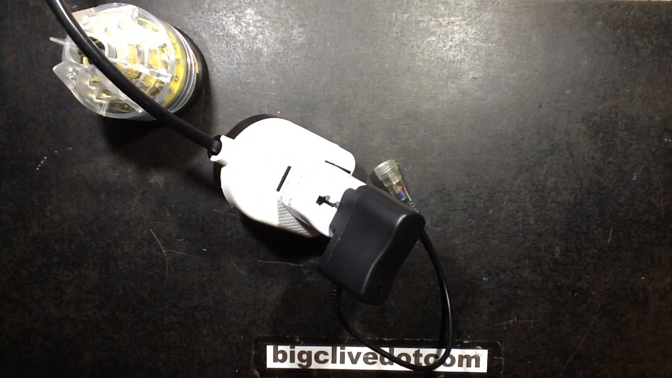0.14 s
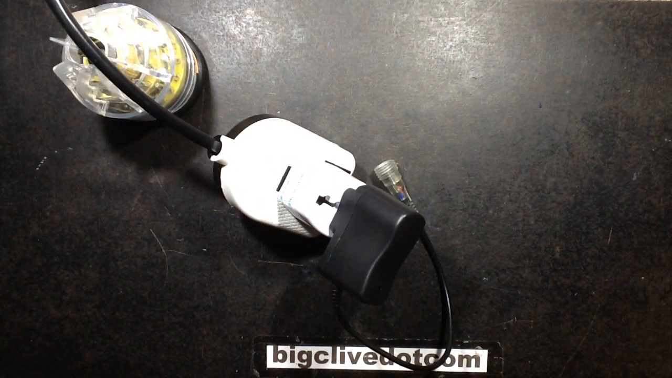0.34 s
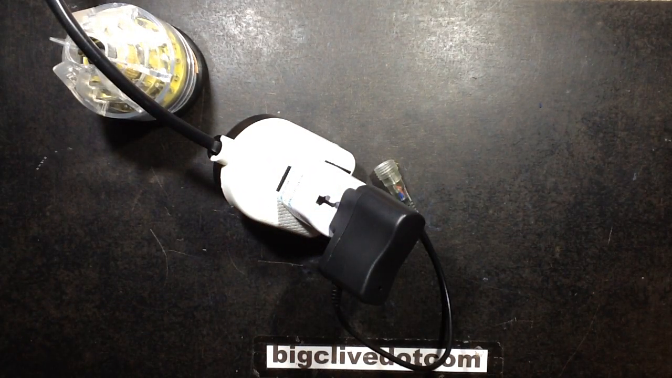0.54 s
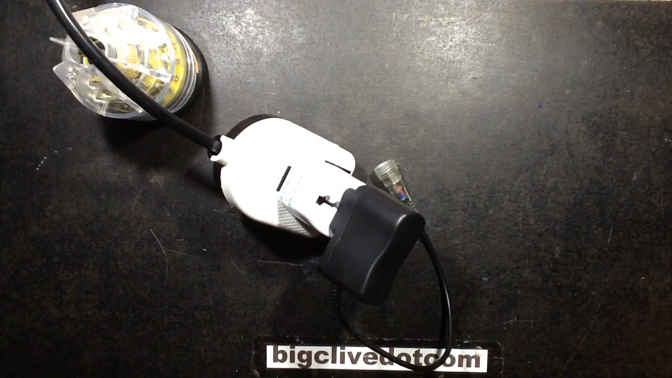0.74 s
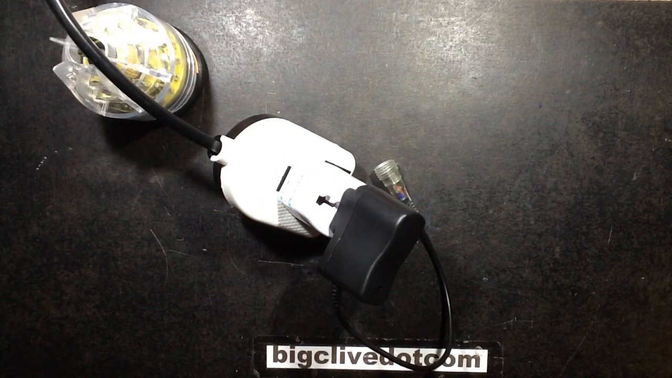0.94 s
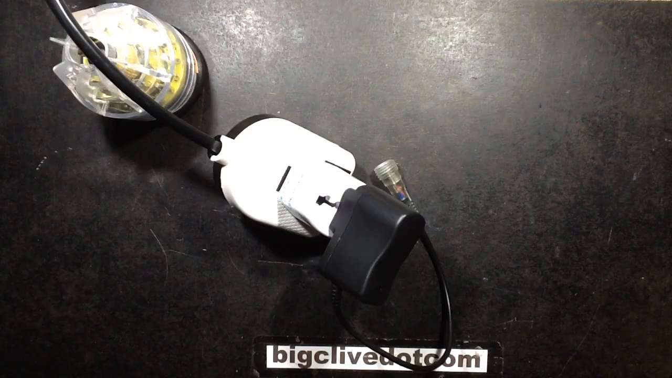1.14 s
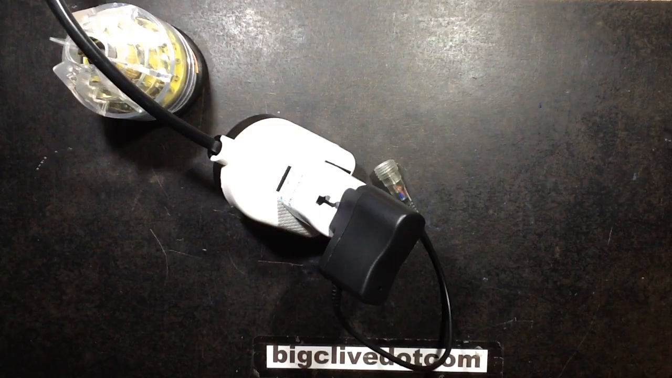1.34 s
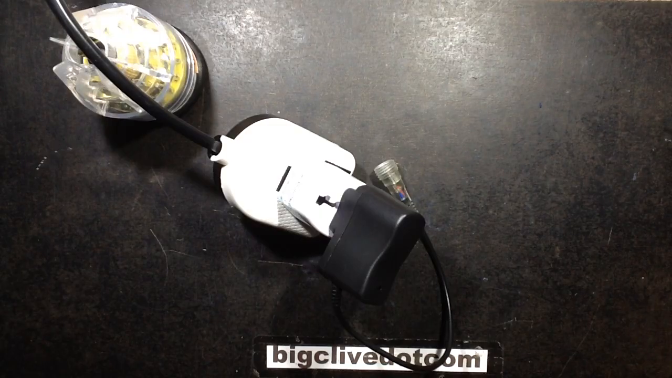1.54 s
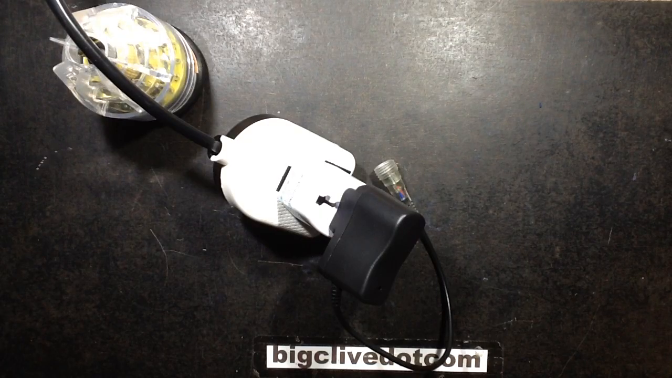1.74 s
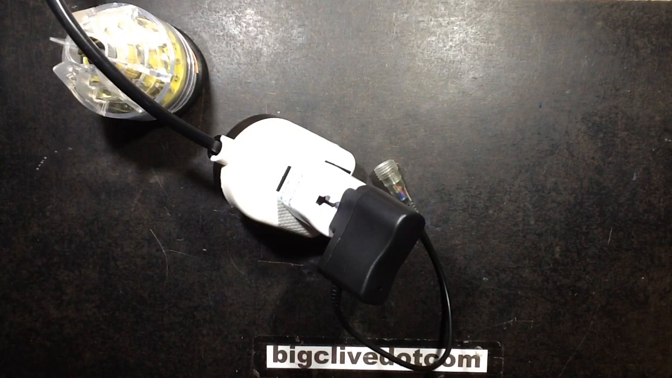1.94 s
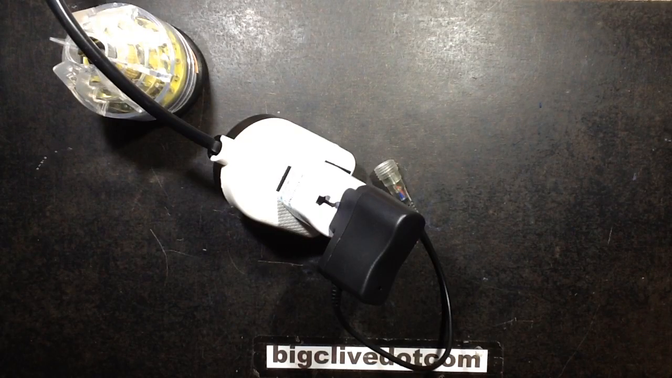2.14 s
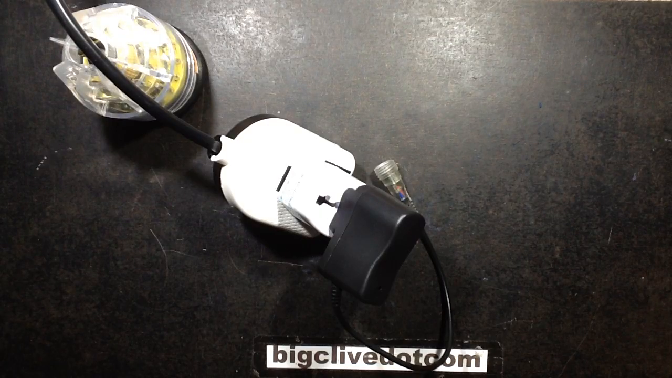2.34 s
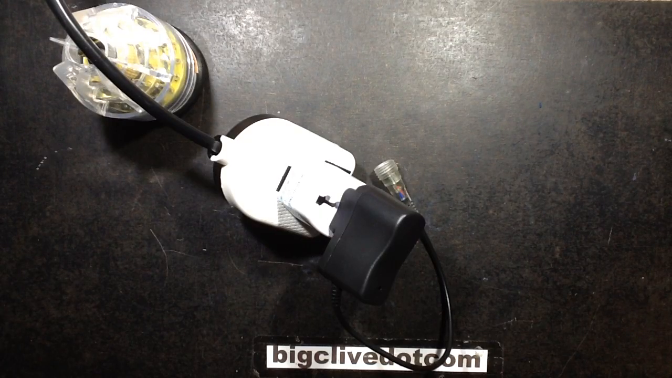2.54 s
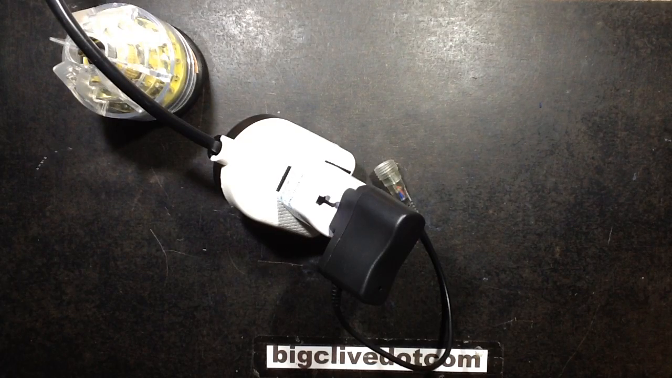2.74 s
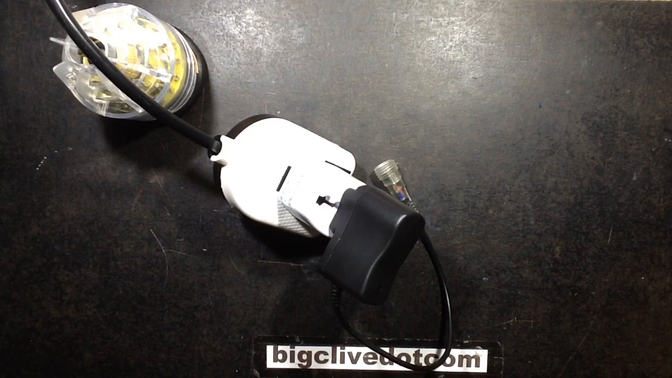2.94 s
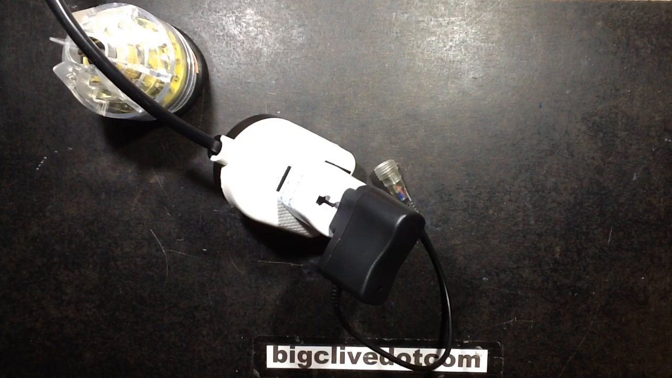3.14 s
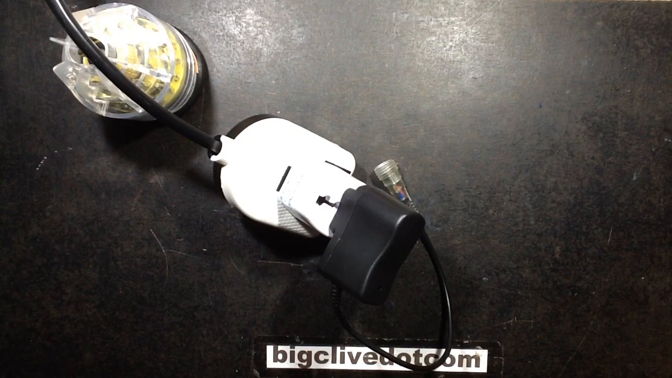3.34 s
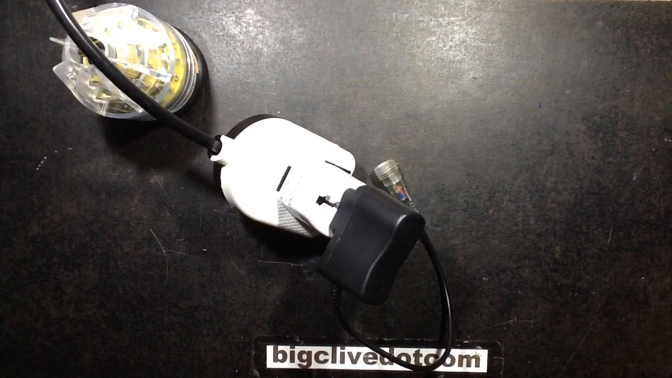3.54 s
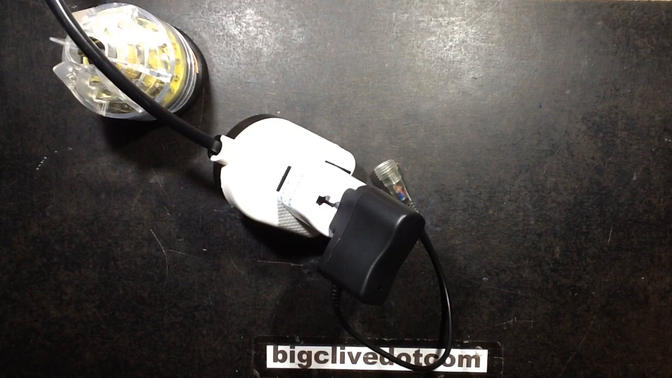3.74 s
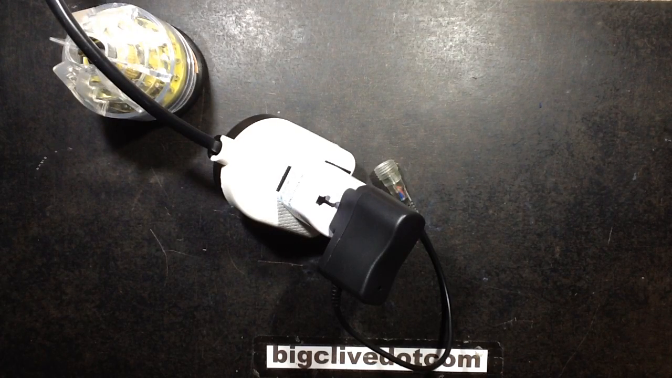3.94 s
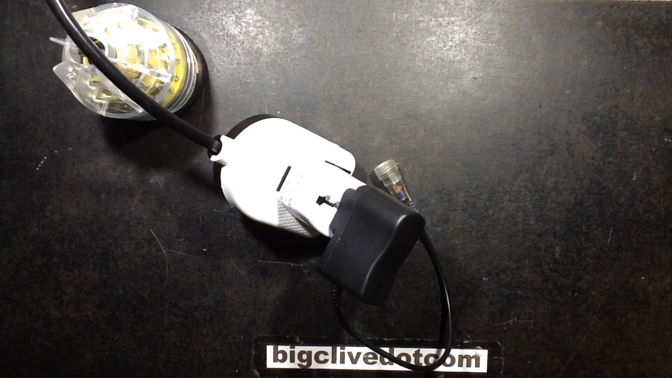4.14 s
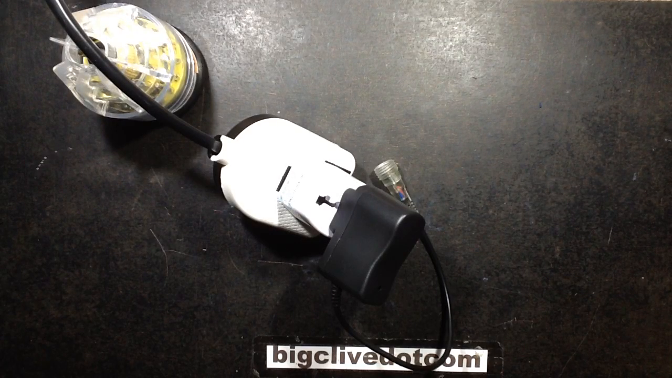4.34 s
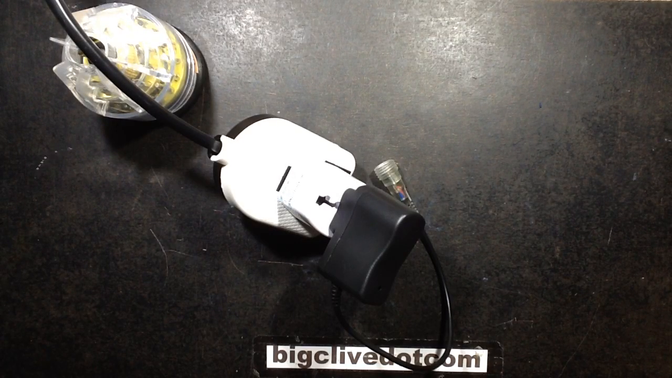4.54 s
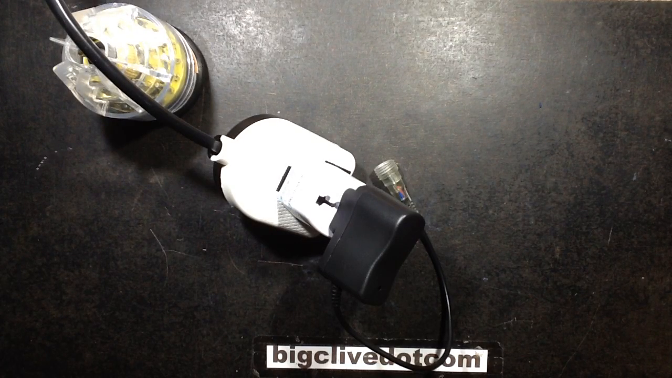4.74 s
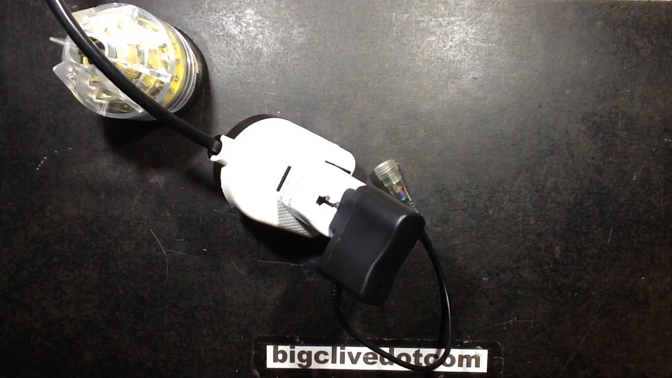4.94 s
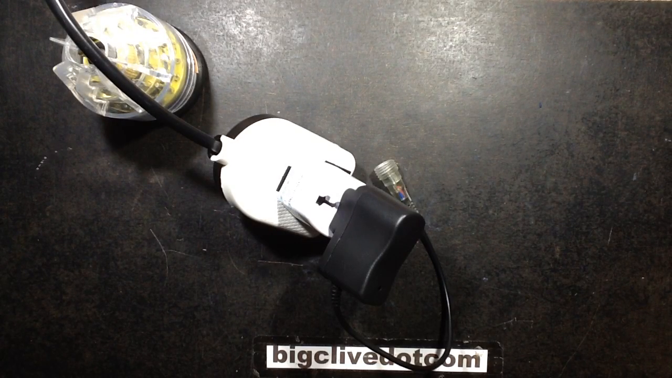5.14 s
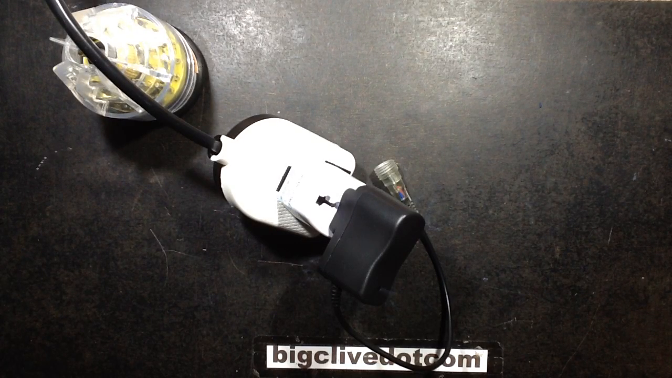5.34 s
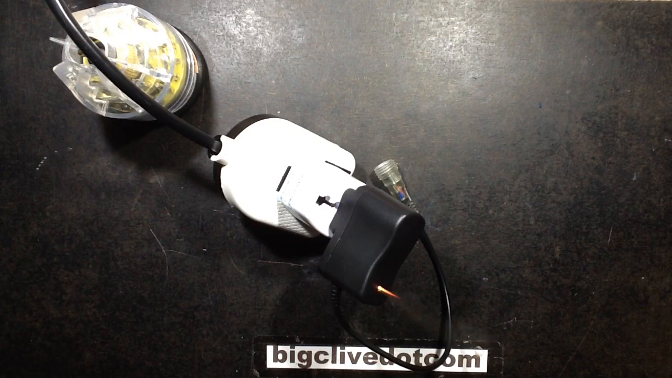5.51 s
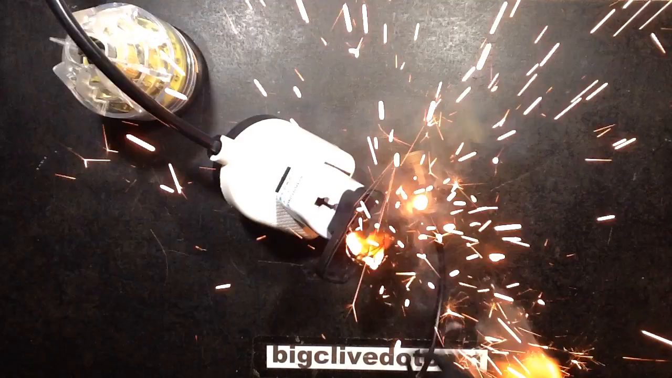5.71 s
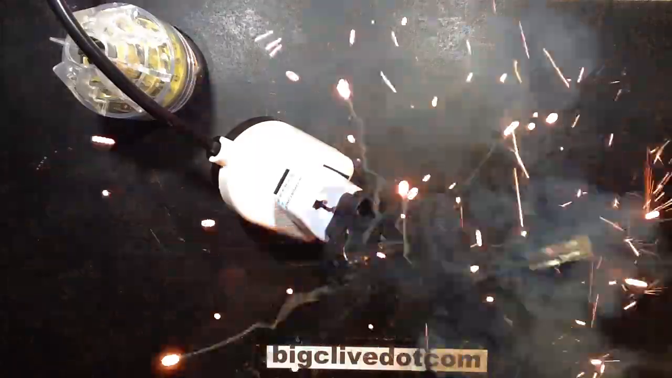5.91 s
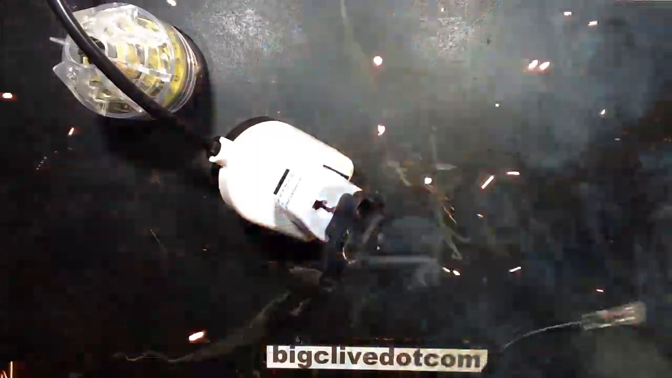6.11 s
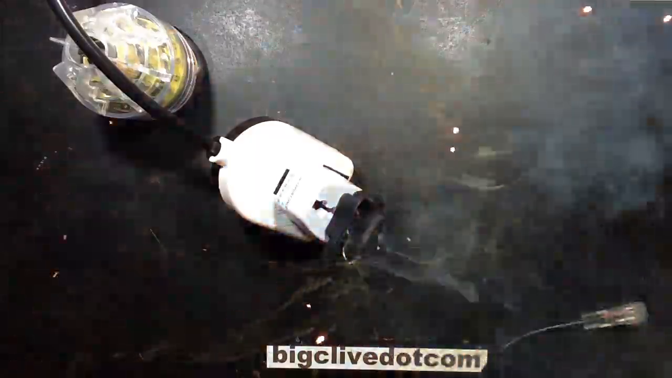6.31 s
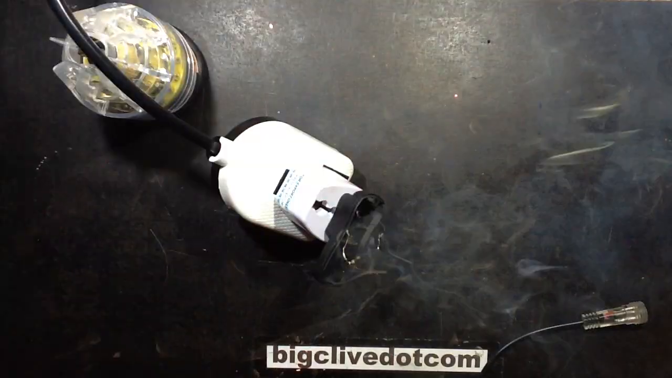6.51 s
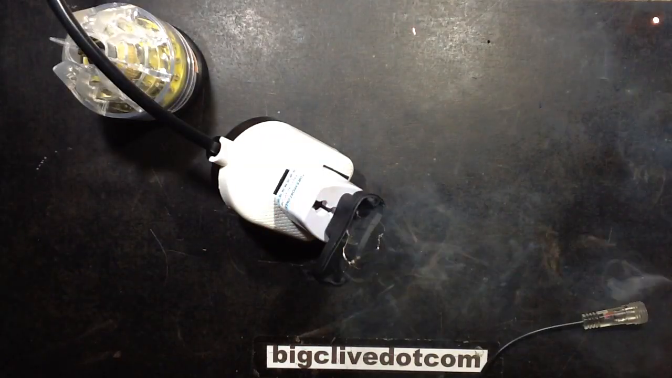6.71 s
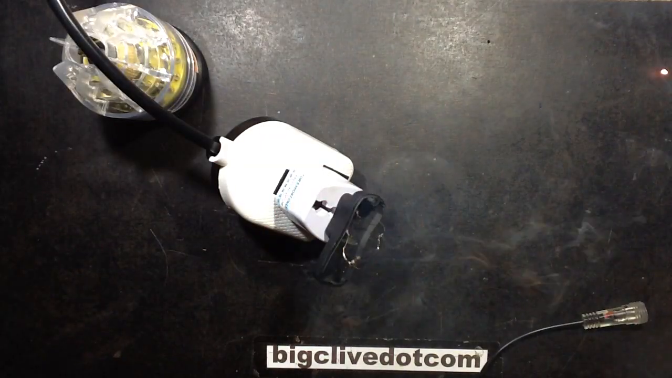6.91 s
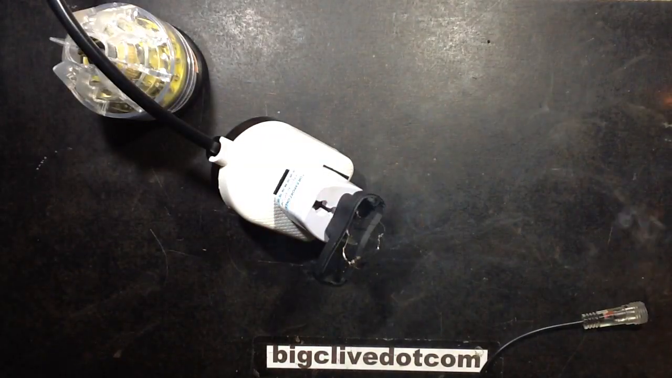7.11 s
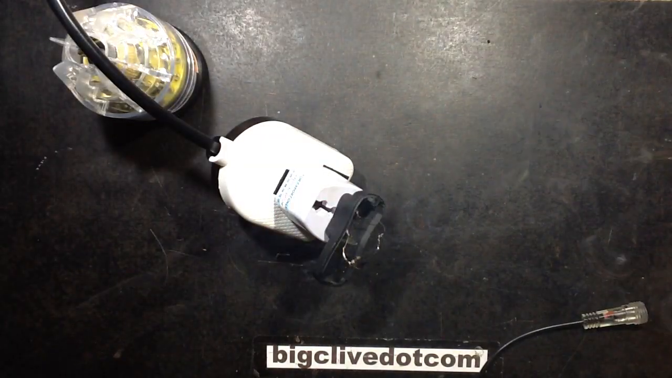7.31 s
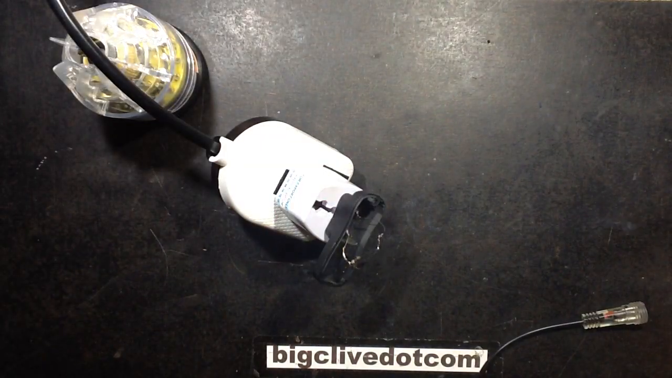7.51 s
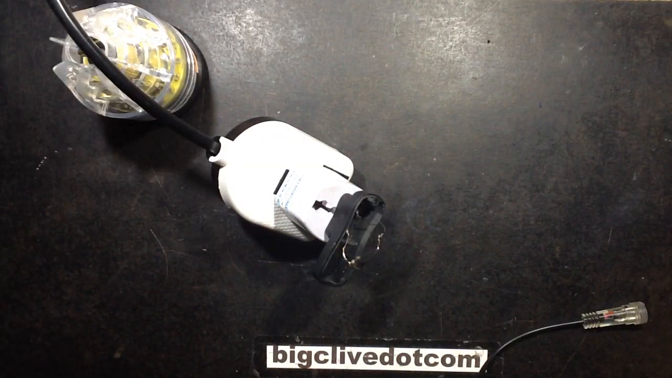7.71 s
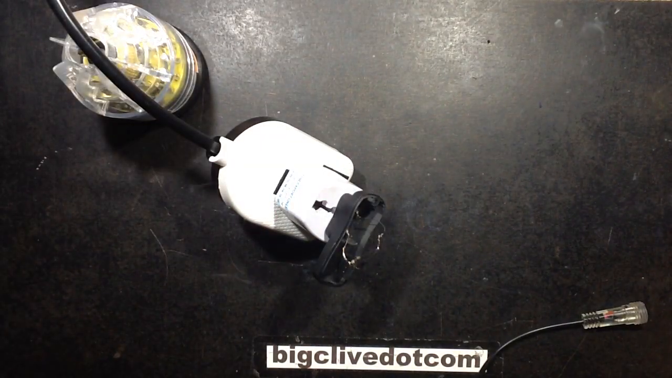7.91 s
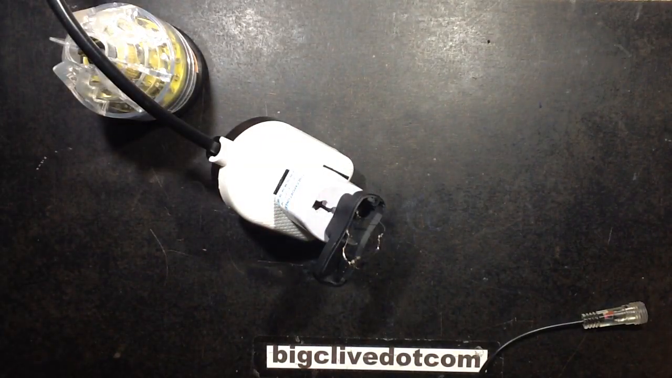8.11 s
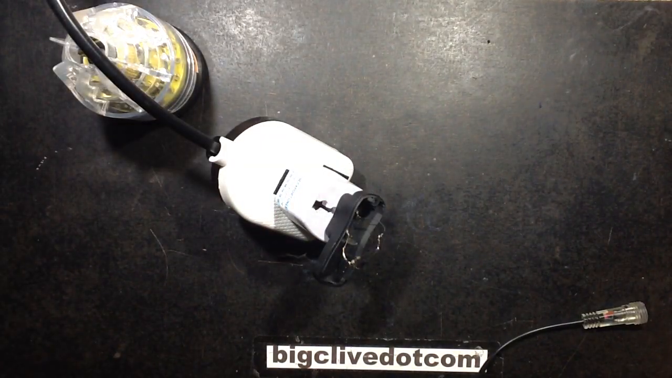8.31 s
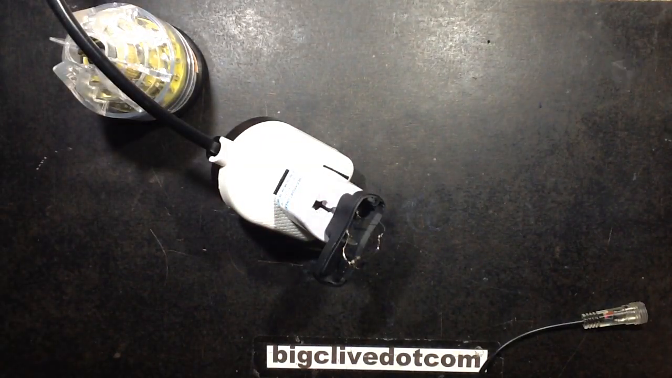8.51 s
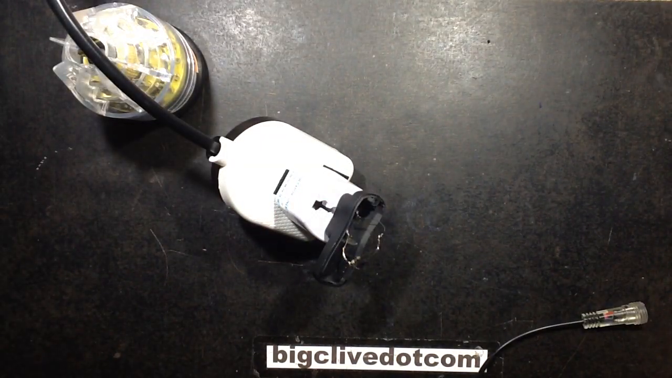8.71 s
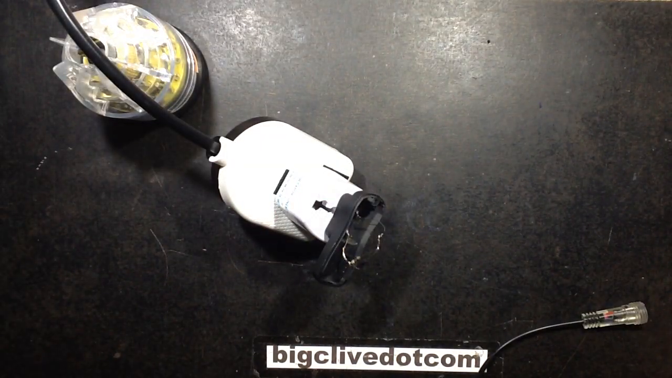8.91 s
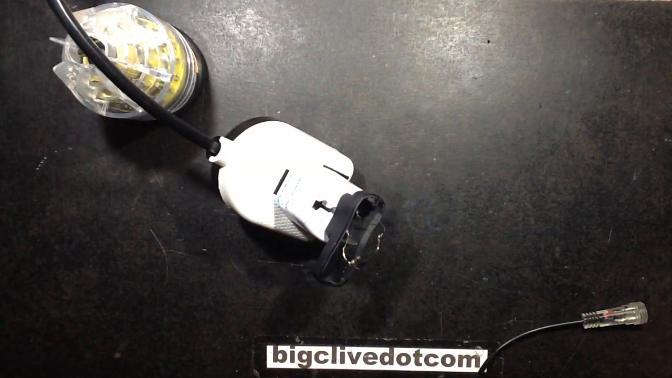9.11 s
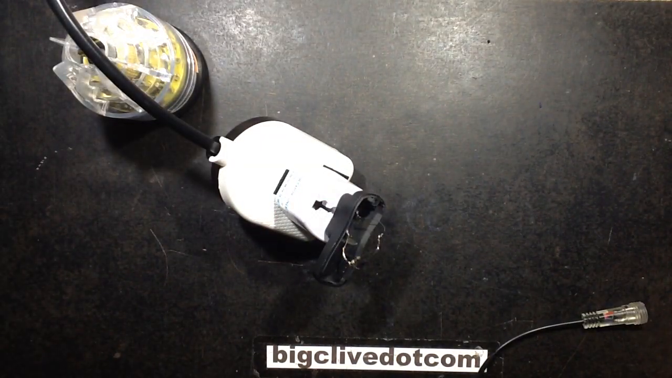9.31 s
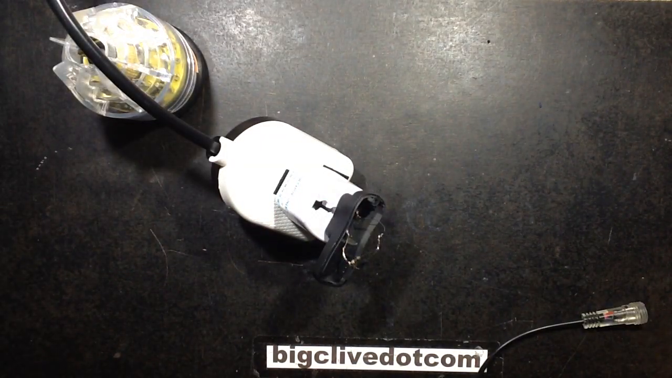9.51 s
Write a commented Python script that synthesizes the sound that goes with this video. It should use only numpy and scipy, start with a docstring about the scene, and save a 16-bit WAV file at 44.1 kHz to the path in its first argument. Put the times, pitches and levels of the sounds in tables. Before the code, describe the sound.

Faint hiss with scattered soft knocks, then a sudden double electrical bang with crackle, plastic pieces clattering down, tiny ticks, and a few late thuds.

```python
"""Power supply bursting on a bench

Over hiss and rumble come far knocks and thuds (swelling noise, damped modes) and rubbing noise.
An arc then strikes on mains half cycles: ragged noise, a pressure swing and ringing case and bench modes.
It bursts the case twice; pieces clack and skitter, embers tick as short noise.
A faint chopped whine sounds near the end, before a last rub."""
import sys
import numpy as np
from scipy import signal
from scipy.fft import rfft, irfft
from scipy.io import wavfile
from scipy.ndimage import uniform_filter1d

SR = 44100
rng = np.random.default_rng(int(sys.argv[2]) if len(sys.argv) > 2 else 0)


def master(y):
    """Save y as 16-bit WAV."""
    cut = np.clip(np.atleast_2d(y).T, -1, 1)
    pcm = np.round(cut * 32767)  # scale
    wavfile.write(sys.argv[1], SR, pcm.astype(np.int16))


N = 421596

# hiss level of the floor, which sinks after the bang and creeps back: (time [s], level [dB])
FLOOR_LEVEL = [(0, -64), (.4, -65.5), (1.1, -67), (2.5, -68), (5.5, -67.8), (6.3, -74), (6.9, -70),
               (7.9, -69), (8.6, -67.5), (9.56, -67.5)]
# relative spectra of hiss and low house rumble: (frequency [Hz], density [dB per Hz])
HISS_SPECTRUM = [(180, -33.5), (300, -3.5), (1000, -3), (2100, -4.5), (6000, -5), (12000, -4.5),
                 (15600, -7), (16500, -30)]
RUMBLE_SPECTRUM = [(12, -54), (20, -22), (27, -31), (70, -21), (73, -2), (87, -3), (187, -1), (293, -3.5),
                   (438, -7), (800, -15), (1040, -38), (1760, -120)]
# far knocks and thuds: plug and switch, bench and floor; each layer scales the rise:
# (time [s], thud [dB], thud frequency [Hz], hollow ring [dB], clatter [dB], nominal rise [s])
KNOCKS = [ (0.184, -70, 171, -90, -86, 0.0054), (1.031, -65, 130, -82, -81, 0.0069),
          (1.192, -67, 2280, -73, -78, .003), (1.244, -57.5, 1630, -63, -76, 0.0056),
          (1.255, -51.5, 520, -68, -70, 0.017), (1.323, -64, 2590, -76, -76, .004),
          (1.335, -57.5, 900, -75, -72, 0.0074), (1.389, -60, 280, -81, -86, 0.009),
          (1.549, -48, 470, -46.5, -42.5, 0.024), (1.795, -69, 2210, -87, -85, 0.0052),
          (1.862, -71, 2520, -87, -74, 0.017), (2.856, -57, 390, -61, -72, .006),
          (2.862, -61.5, 4500, -84, -67, 0.019), (2.987, -69, 404, -63, -82, .01),
          (3.026, -53.5, 374, -45.5, -66, 0.015), (3.093, -62, 111, -74, -76, 0.03),
          (3.15, -57.5, 1170, -61, -71.5, 0.019), (3.309, -46.5, 320, -42, -48, 0.004),
          (3.322, -50.5, 750, -42, -44.5, 0.011), (3.401, -59.5, 400, -55.5, -65.5, 0.0091),
          (3.61, -66.5, 450, -75, -77, 0.0068), (3.969, -66.5, 298, -71, -64.5, 0.006),
          (4.035, -70, 300, -67, -66, 0.0026), (4.074, -64, 1300, -59, -66, 0.0011),
          (4.088, -44.5, 213, -42.5, -35, 0.032), (4.206, -59, 746, -63, -65, 0.0013),
          (5.523, -47.5, 200, -69, -76, 0.0049), (5.536, -51, 504, -72, -49, 0.0011),
          (7.795, -67, 218, -82.5, -77, 0.0092), (8.692, -40.5, 597, -47, -69, .001),
          (8.887, -50, 349, -69, -80, 0.0069), (8.905, -48.5, 182, -72, -85, .012),
          (8.9, -53.5, 74.6, -80, -90, 0.051), (8.924, -50.5, 650, -62, -69, 0.0018),
          (8.970, -42.5, 395, -64, -80, 0.0013), (9.046, -65.5, 1620, -80, -78, .008)]
# clatter spectrum before soft blows are dulled: (frequency [Hz], density [dB per Hz])
CLATTER_SPECTRUM = [(710, -28), (1200, -3.5), (1570, -10.5), (2270, -1), (3430, -4), (4040, 0),
                    (7910, -4.5), (14400, -15), (15500, -22), (16000, -44)]
# hollow tones shared by all knocks, before their envelope: (frequency [Hz], relative level [dB], t60 [s])
HOLLOW_MODES = [(987, -2.5, 2), (1028, -8.5, 2), (957, -4.5, 2)]
# strokes of sliding clothes and cable:
# (start [s], length [s], low part [dB], bright part above it [dB], bright frequency [Hz])
RUSTLES = [(1.423, 0.16, -64.5, -25, 2400), (3.81, 0.1, -64, -0.5, 1750), (3.88, 0.083, -67, 3.5, 4500),
           (6.85, 0.18, -77.5, 6.5, 2710), (7.951, 0.21, -67, -1.5, 2110), (8.111, 0.11, -67.5, -3, 1790),
           (8.571, 0.39, -68, 3, 1850), (8.793, 0.13, -72, -8, 2510), (9.072, 0.19, -69.5, -4.5, 2600),
           (9.33, 0.22, -75, 1, 2900)]
# arc strikes: (time [s], spit [dB], push [dB], nominal push frequency [Hz], case ring [dB], burn t60 [s])
STRIKES = [ (5.6049, -62, -44, 598, -60.5, .02), (5.615, -66, -60.5, 605, -56.5, .02),
           (5.6256, -35.5, -13, 547.4, -30.5, .012), (5.6362, -49.5, -21, 598.7, -40, .015),
           (5.645, -47.5, -25, 491.6, -40.5, .01), (5.655, -13, -8.5, 395.5, -38, .035),
           (5.6616, -18, -16.5, 650, -47, .05), (5.6656, -14.5, -14.5, 330, -43, .03),
           (5.755, -48.5, -62.5, 496, -65, .02), (5.778, -47.5, -62, 500, -70.5, .015),
           (5.785, -41, -61.5, 503.6, -62, .012), (5.794, -12.5, -17, 893, -46, .025),
           (5.803, -13, -11.5, 505.6, -43.5, .035), (5.8076, -16, -11.5, 270, -47.5, .012)]
# relative spectrum of the spitting arc: (frequency [Hz], density [dB per Hz])
SPIT_SPECTRUM = [(470, -34.5), (800, -10), (1550, -7), (2470, -1), (3220, -8.5), (4180, -1.5),
                 (5510, -12.5), (6910, -6.5), (11600, -7.5), (15000, -11), (16000, -30.5)]
# modes of the plastic case: (frequency [Hz], relative level [dB], t60 [s])
CASE_MODES = [(1170, 5.5, 0.014), (1474, 3, 0.018), (2000, 2, 0.02), (2550, 0.5, 0.016), (4400, -8, 0.018),
              (5900, 0.5, 0.021), (8160, -2, .025), (10300, -3.5, 0.029), (12500, -3, .018),
              (14500, -7.5, .02)]
# bench modes, before the thump envelope: (frequency [Hz], relative level [dB], t60 [s])
BENCH_MODES = [(190, -0.5, .13), (255, -3, 0.085), (351, -6, 0.15), (400, -5.5, 0.13), (468.4, -5.5, 0.18),
               (617.6, -10, 0.13), (667, -6.5, 0.11)]
# pieces landing on the bench: (time [s], shell [dB], chip [dB], chip frequency [Hz])
PIECES = [ (5.921, -30.5, -35.5, 5500), (5.959, -33.5, -58, 6200), (6.011, -49.5, -58, 6900),
          (6.031, -69, -34.5, 7660), (6.0347, -41, -55, 8070), (6.047, -47.5, -61, 5700),
          (6.0926, -62, -38, 9700), (6.152, -65.5, -40, 9480), (6.19, -70, -53, 3900),
          (6.225, -80, -51, 8950)]
# modes of the hollow shell, before its envelope: (frequency [Hz], relative level [dB], t60 [s])
SHELL_MODES = [(1010, 14, 0.039), (1430, -13, .07), (1710, 11, 0.034), (2176, 7.5, 0.16),
               (2640, 6.5, 0.032), (2780, 12, 0.061), (2996, -3, .05), (3280, -10, .05)]
# clearest ticks of embers and grit: (time [s], level [dB], frequency [Hz])
TICKS = [(6.28, -52, 8200), (6.3095, -57, 11470), (6.331, -50, 4970), (6.443, -57, 7970),
         (6.465, -57, 13570), (6.48, -60, 9580), (6.498, -54, 1884), (6.5665, -56.5, 2230),
         (6.605, -56.5, 7680), (6.6693, -57, 14000), (6.7932, -58.5, 1930), (6.8016, -45, 3350),
         (6.9306, -58, 9730), (6.942, -53, 12900), (7.1667, -60, 6880), (7.1875, -57.5, 10130),
         (7.2231, -57, 12720), (7.3892, -57, 3530), (7.4303, -60.5, 3400)]
# a light piece coming to rest:
# (level [dB], t60 [s], fizz frequency [Hz], tone frequency [Hz], tone relative to fizz [dB])
SKITTER = (-60, 0.6, 7103, 5950, -4)
# bands of the whine; width over frequency is taken as octaves:
# (frequency [Hz], nominal width [Hz], relative level [dB])
WHINE_BANDS = [(4680, 55, -12), (7180, 220, -6), (8180, 76, -10), (10500, 170, 0), (13600, 85, -2)]
# faint whine; a negative start counts back from the end, a negative rise means the shortest:
# (start [s], rise [s], level before chopping [dB], t60 [s])
WHINE_BURST = (-0.5, -1.5, -67, 1.)
# decay of the room reflections: (frequency [Hz], t60 [s])
ROOM_DECAY = [(100, 0.15), (260, 0.31), (700, 0.38), (1840, 0.22), (4850, 0.24), (12800, 0.24)]

RUMBLE_DB = -9  # relative to the hiss
KNOCK_T60_S, DRAG = 0.18, 2.  # least decay, and seconds of decay added per second of rise
SHARP_S, HOLLOW_T60_S = .004, .22  # slower rises than SHARP_S lose the first swing
STROKE_IN, STROKE_OUT = 0.31, 0.53  # shares of a stroke: fully up, starting to ease off
CRACK_S, CRACK_DB = .00006, 8  # opening shock of a strike: time constant, level above the spit
RATTLE_T60_S, CHIP_T60_S, TICK_T60_S = 0.028, 0.019, 0.021
SKITTER_S, SKITTER_RISE_S = 6.158, .004
MAINS_HZ = 50
EDGE_HZ = 15650  # upper band limit


def amp(db):
    """Logarithmic level: decibels become an amplitude ratio."""
    return 10 ** (np.asarray(db) / 20)


def evened(x):
    """Mean-square normalisation: scales a signal to rms 1."""
    return x / np.sqrt(np.mean(x ** 2) + 1e-20)


def read(points, hz):
    """Logarithmic frequency scale: interpolates a table along it."""
    f, value = np.transpose(points)
    return np.interp(np.log(hz + 1), np.log(f + 1), value)


def add(mix, s, sound):
    """Superposition: adds a sound from s seconds on, or from the end if s is negative."""
    part = mix[round(s * SR):][:len(sound)]
    part += sound[:len(part)]


def noise(spectrum, size):
    """Spectral shaping: white noise takes the given spectrum, at rms 1."""
    white = rfft(rng.standard_normal(size))
    hz = np.fft.rfftfreq(size, 1 / SR)
    return evened(irfft(white * amp(read(spectrum, hz)), size))


def wander(size, span):
    """Random fluctuation: white noise smoothed over span samples, at rms 1."""
    return evened(uniform_filter1d(rng.standard_normal(size), span))


def band(hz, width, slope_db):
    """Broad resonance: flat over width octaves, then falling slope_db an octave for four octaves."""
    half = width / 2
    return [(hz / 2 ** (half + 4), -4 * slope_db), (hz / 2 ** half, 0),
            (hz * 2 ** half, 0), (hz * 2 ** (half + 4), -4 * slope_db)]


def swell(t, rise, t60):
    """Build-up and decay: a quarter-sine rise, then an exponential fall of 60 dB in t60."""
    rise = max(rise, 1e-4)
    growth = np.sin(np.pi / 2 * np.minimum(t / rise, 1))
    return growth * amp(-60 * np.maximum(t - rise, 0) / max(t60, 1e-3))


def ring(modes, t, detune):
    """Modal vibration: a sum of damped sines, each blow a little off in pitch and random in phase."""
    offsets = rng.uniform(-1, 1, (len(modes), 2))
    total = np.zeros(len(t))
    for (hz, db, t60), (pitch, phase) in zip(modes, offsets):
        sine = np.sin(2 * np.pi * hz * (1 + detune * pitch) * t + np.pi * phase)
        total += amp(db - 60 * t / t60) * sine
    return total


def push(t, hz, damping):
    """Heavily damped oscillation: one main swing out and back, its pitch sinking slightly."""
    return -np.sin(2 * np.pi * hz * t ** .97) * np.exp(-damping * hz * t)


def floor():
    """Stationary noise under a slow level: microphone hiss over the low rumble of the house."""
    level = amp(np.interp(np.arange(N) / SR, *np.transpose(FLOOR_LEVEL)))
    return level * (noise(HISS_SPECTRUM, N) + amp(RUMBLE_DB) * noise(RUMBLE_SPECTRUM, N))


def knocks():
    """Diffuse impact sound: reflections dominate, so blows are noisy, swell and lose treble first."""
    out, t = np.zeros(N), np.arange(16384) / SR
    for s, thud_db, thud_hz, ring_db, clatter_db, rise in KNOCKS:
        t60 = KNOCK_T60_S + DRAG * min(rise, .015)  # a slow swell also lingers

        # a close cluster of hollow tones in a blur of reflections
        blur = amp(-9) * noise(band(HOLLOW_MODES[0][0], .45, 26), len(t))
        body = (ring(HOLLOW_MODES, t, .01) + blur) * swell(t, 0.59 * rise, HOLLOW_T60_S)

        # low thuds are wider in octaves and decay more slowly
        thud_width = 0.45 * (300 / thud_hz) ** 0.26
        thud_t60 = 1.1 * t60 * (300 / thud_hz) ** 0.29
        thud = noise(band(thud_hz, thud_width, 10.0), len(t)) * swell(t, 1.2 * rise, thud_t60)
        # a sharp blow shows its first swing
        thud = thud + amp(9) * np.exp(-rise / SHARP_S) * push(t, thud_hz, 0.79)

        dull_db = 0.096 * min(clatter_db + 48.0, 0)  # per octave: soft blows carry less treble
        colour = [(f, db + dull_db * np.log2(f / 2500)) for f, db in CLATTER_SPECTRUM]
        duller = [(f, db - 9.1 * np.log2(f / 2500)) for f, db in colour]
        clatter = noise(colour, len(t)) * swell(t, rise, 0.67 * t60)
        lingering = amp(-7) * noise(duller, len(t)) * swell(t, rise, t60)
        uneven = amp(0.58 * wander(len(t), 120))  # uneven contacts
        clatter = (clatter + lingering) * uneven

        add(out, s, amp(ring_db) * body + amp(thud_db) * thud + amp(clatter_db) * clatter)
    return out


def rustles():
    """Friction noise: low and bright rubbing follows each stroke, roughened by small slips."""
    out, size = np.zeros(N), 16384
    for s, length, low_db, bright_db, hz in RUSTLES:
        progress = np.arange(size) / SR / length
        stroke = np.interp(progress, [0, STROKE_IN, STROKE_OUT, 1], [0, 1, 1, 0])
        slips = amp(2. * wander(size, 300))
        low = noise(band(360, 2.1, 9.1), size)
        bright = amp(bright_db) * noise(band(hz, 0.37, 6.6), size)
        add(out, s, amp(low_db) * (low + bright) * slips * stroke)
    return out


def arc():
    """Impulsive discharge: each strike spits noise, pushes the air, rings the case, thumps the bench."""
    out, t = np.zeros(N), np.arange(8192) / SR
    for s, spit_db, push_db, hz, case_db, t60 in STRIKES:
        ragged = amp(6.0 * wander(len(t), 14))
        spit = evened(noise(SPIT_SPECTRUM, len(t)) * ragged) * swell(t, 0.00022, t60)
        crack = -amp(CRACK_DB) * (1 - t / CRACK_S) * np.exp(-t / CRACK_S)
        thump = amp(-18) * ring(BENCH_MODES, t, 0.049) * swell(t, .003, 3.)
        pressure = push(t, hz, 1.15) + thump
        case = ring(CASE_MODES, t, 0.0084)
        add(out, s, amp(spit_db) * (spit + crack) + amp(push_db) * pressure + amp(case_db) * case)
    return out


def room(x, bass_db):
    """Reverberation: sparse reflections of random sign, each band decaying at its own rate."""
    taps = np.zeros(SR // 2)
    at = np.arange(200, len(taps) - 16, 16)
    taps[at + rng.integers(0, 16, len(at))] = rng.choice([-1., 1.], len(at))
    hz, t, z = signal.stft(taps, SR, nperseg=256)
    decay_db = -60 * t / read(ROOM_DECAY, hz)[:, None]
    boom_db = read([(200, bass_db), (1000, 0.0016)], hz)[:, None]
    tail = signal.istft(z * amp(decay_db), SR, nperseg=256)[1]
    boomy = signal.istft(z * amp(boom_db + decay_db), SR, nperseg=256)[1]
    # scaled by the plain tail, so the bass boost adds energy
    return signal.fftconvolve(x, boomy / np.linalg.norm(tail))[:N]


def pieces():
    """Impact excitation of modes: the hollow shell clacks and rattles; thin chips snap higher up."""
    out, t = np.zeros(N), np.arange(8192) / SR
    for s, shell_db, chip_db, hz in PIECES:
        rattle_fade = swell(t, 0.0016, RATTLE_T60_S) + amp(-11.0) * swell(t, 0.0021, 0.22)
        rattle = noise(band(1980, 0.73, 9.3), len(t)) * rattle_fade
        clack = amp(-8.5) * ring(SHELL_MODES, t, 0.054) * swell(t, 0.00059, 0.19)
        thump = amp(-8.0) * ring(BENCH_MODES, t, 0.061) * swell(t, 0.0026, 3.)
        snap = noise(band(hz, 0.8, 6.7), len(t)) * swell(t, 0.00024, CHIP_T60_S)
        # the chip's own short ring
        chip_ring = amp(-11.5) * noise(band(hz, .05, 50.), len(t)) * swell(t, 0.00093, 1.8 * CHIP_T60_S)
        add(out, s, amp(shell_db) * (clack + rattle + thump) + amp(chip_db) * (snap + chip_ring))
    return out


def embers():
    """Random impulses: tiny broad ticks, with fainter ones thinning out as the sparks die."""
    out, t = np.zeros(N), np.arange(2048) / SR
    for s, db, hz in TICKS:
        ping = amp(-9.5) * ring([(hz, 0, 1.6 * TICK_T60_S)], t, 0.0082)
        tick = noise(band(hz, 0.4, 2.0), len(t)) * swell(t, 0.0005, TICK_T60_S)
        add(out, s, amp(db) * (tick + ping))
    for place, size, pitch in rng.random((60, 3)):
        s = 6.15 + 1.5 * place ** 2  # squaring crowds them early
        tick = noise(band(3000 * 4 ** pitch, 1.4, 4.5), len(t)) * swell(t, 0.000447, 0.012)
        add(out, s, amp(-68.5 + 4.5 * size) * tick)
    return out


def skitter():
    """Repeated light contact: a decaying, uneven treble fizz with one thin tone."""
    db, t60, hz, tone_hz, tone_db = SKITTER
    out, t = np.zeros(N), np.arange(8192) / SR
    uneven = amp(3. * wander(len(t), 400))
    fizz = noise(band(hz, 0.23, 26.0), len(t)) * uneven * swell(t, SKITTER_RISE_S, t60)
    tone = noise(band(tone_hz, .02, 200.), len(t)) * swell(t, SKITTER_RISE_S, 0.13)
    add(out, SKITTER_S, amp(db) * (fizz + amp(tone_db) * tone))
    return out


def whine():
    """Amplitude modulation: a quarter second of narrow noise bands, chopped twice a mains cycle."""
    s, rise, db, t60 = WHINE_BURST
    t = np.arange(11025) / SR
    bands = sum(amp(d) * noise(band(hz, width / hz, 400.), len(t)) for hz, width, d in WHINE_BANDS)
    fade = swell(t, rise, t60) * np.minimum((t[-1] - t) / .04, 1)
    chop = np.sin(2 * np.pi * MAINS_HZ * t) ** 2
    out = np.zeros(N)
    add(out, s, amp(db) * fade * evened(bands) * chop)
    return out


def cut_bass(x, order):
    """High-pass filtering: removes the deep bass below 85 Hz."""
    return signal.sosfilt(signal.butter(order, 85, "high", fs=SR, output="sos"), x)


def scene():
    """Direct and reverberant fields: bench sounds are dry with a room tail; the rest adds as it is."""
    blast = cut_bass(arc(), 2)  # a small case sends out little deep bass
    debris = pieces() + embers() + skitter()
    wet = room(amp(-16.5) * blast + amp(-10.5) * debris, bass_db=1.5)
    return (floor() + knocks() + rustles() + blast + debris + wet + whine())[None]


def record(dry):
    """Transducer limits: the microphone cuts deep bass and rounds off peaks; then the band limit."""
    rounded = 0.93 * np.tanh(cut_bass(dry, 3) / 0.87)
    lowpass = signal.firwin(511, EDGE_HZ, window=("kaiser", 9), fs=SR)
    return signal.oaconvolve(rounded, lowpass[None], "same")


dry = scene()
out = record(dry)
master(out)
```